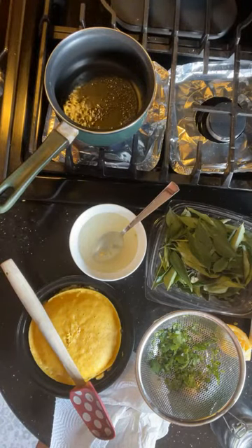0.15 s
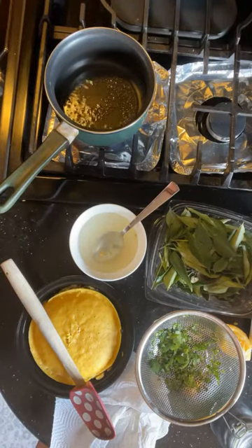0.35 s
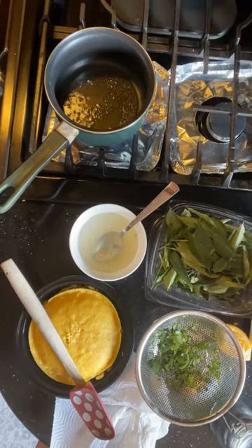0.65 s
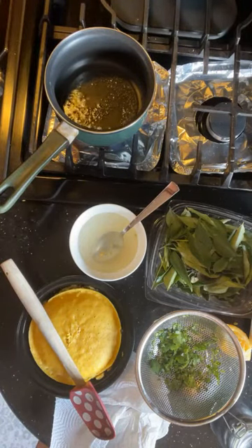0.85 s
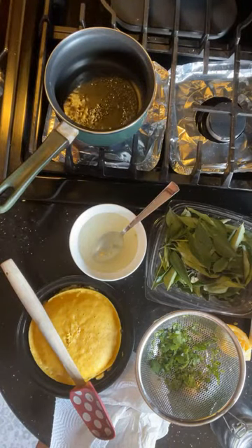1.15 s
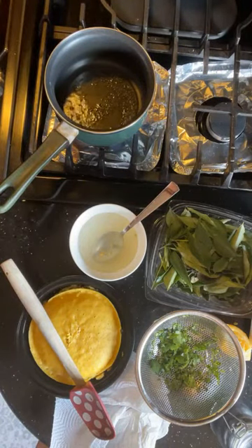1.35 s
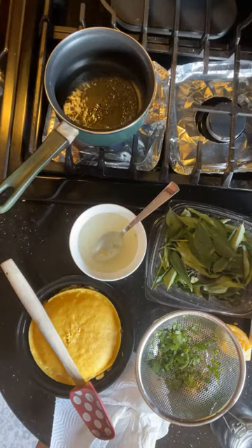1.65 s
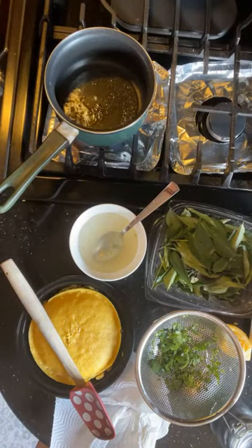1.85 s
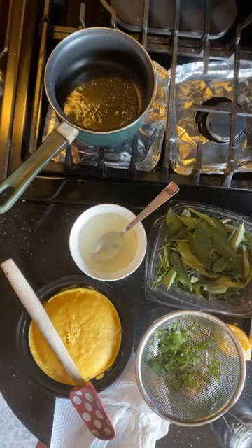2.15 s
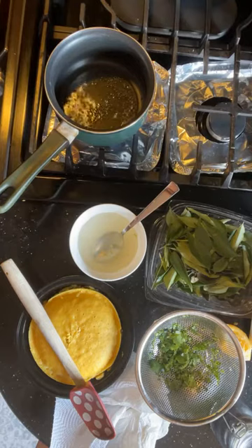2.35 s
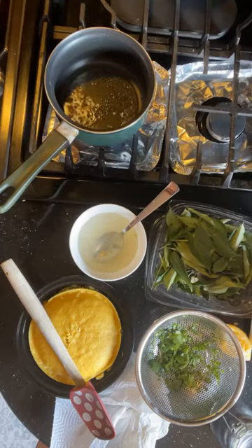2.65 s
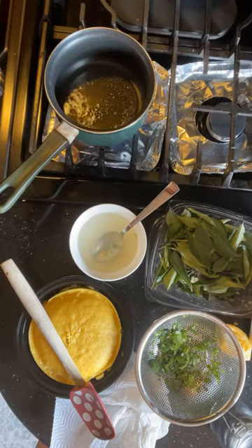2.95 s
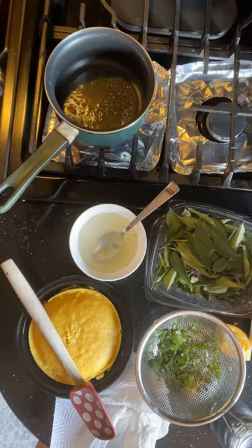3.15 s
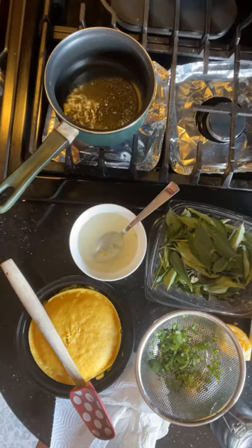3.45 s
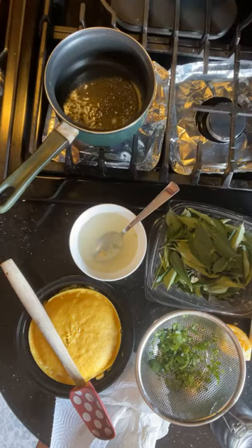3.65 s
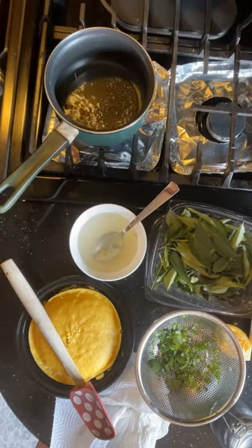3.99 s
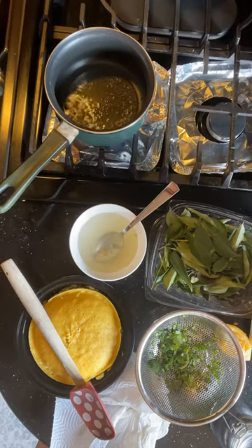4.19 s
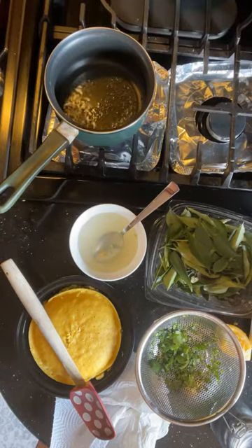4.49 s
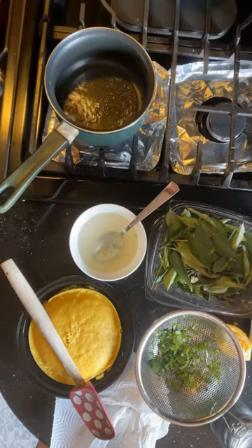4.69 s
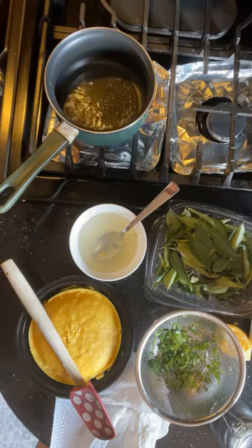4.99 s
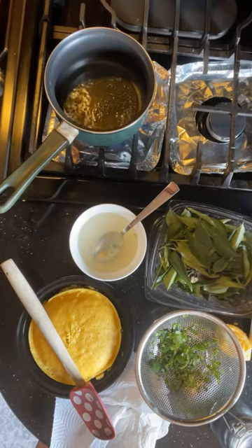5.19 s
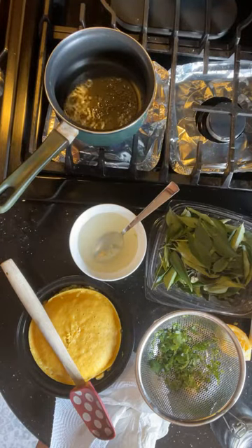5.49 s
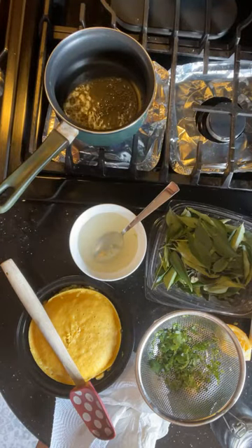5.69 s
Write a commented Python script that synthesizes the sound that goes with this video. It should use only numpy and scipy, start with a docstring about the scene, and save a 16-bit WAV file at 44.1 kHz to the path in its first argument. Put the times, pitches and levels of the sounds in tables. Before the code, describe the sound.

Close, sharp pops of seeds bursting in hot oil ring briefly in a small metal pan over a faint fizz and low kitchen hum. Early pops are scattered; from about 1.4 seconds they become frequent, and from 3 seconds strong and dense. A drawer slides and knocks heavily near 0.7 seconds, with lighter utensil clicks later and short metal scrapes around 3.5. Single nearby microphone, mono, small hard room.

```python
"""Sharp pops of mustard seeds bursting in hot oil, over a faint fizz and a low room hum.
Further off, a drawer slides, utensils knock and rattle, and metal scrapes briefly on metal.
Pops and knocks are filtered clicks that set dying tones ringing and leave echoes of fading noise.
Sliding and hum are shaped noise; fizz and scraping are made of thousands of tiny random clicks."""
import sys
import numpy as np
from scipy import signal
from scipy.fft import rfft, irfft
from scipy.io import wavfile

SR = 44100
rng = np.random.default_rng(int(sys.argv[2]) if len(sys.argv) > 2 else 0)


def unload_wav(signal):
    """Save mono or channel-first audio to the path in sys.argv[1] as 16-bit WAV at rate SR, clipped to [-1, 1]."""
    wavfile.write(
        sys.argv[1],
        SR,
        np.round(np.clip(np.atleast_2d(signal).T, -1, 1) * 32767).astype(np.int16),
    )


N = 257103   # length of the scene in samples

# Colour of the room hum and oil fizz. Each row: pitch in Hz, relative level in dB per Hz.
FLOOR_COLOUR = [(18, -19), (30, -0.5), (98, 7), (359, -0.5), (455, 0), (752, -5.5), (858, 4), (900, -4),
                (1100, 1.5), (1270, -4.5), (1380, 5), (1620, -18), (2600, -16), (2810, -7.5), (4900, -14.5),
                (15200, -42), (16500, -19)]
FLOOR_DB = -59.5

# Simmer of the oil. Each row: time in seconds, level in dB.
SIMMER_LEVEL = [(0, -55.5), (.34, -67), (.6, -58.5), (.9, -58.5), (1.18, -63.5), (2.08, -59.5),
                (2.6, -62.5), (3.2, -56.5), (3.9, -58), (4.4, -54.5), (5.25, -59), (5.5, -56.5),
                (5.83, -58)]
# The oil flares up. Each row: start in seconds, length in seconds, level in dB, swell over the length in dB.
OIL_FLARES = [(.565, 0.094, -52, -11), (2.19, 0.098, -46, -17), (3.36, 0.23, -54, -1), (4.88, .05, -43, 0),
              (4.98, 0.11, -39.5, -15.5)]
FLARE_RISE_DB_PER_S, FLARE_FALL_DB_PER_S = 604, 110

# Seed bursts. Each row: time in seconds, level of the snap (4.5-9.5 kHz) in dB, then in dB against
# the snap: body (2-4.5 kHz), low push (100-500 Hz), air (9.5-16.5 kHz); last the pitch of the ping in Hz.
SEED_POPS = [(0.0574, -22.5, -9.5, -19.5, 6, 3110), (0.2233, -40, -2, -24, -12, 3130),
             (.2547, -40, -30, -20, -4, 3270), (0.4408, -30.5, 3.5, -47, -23, 3810),
             (0.455, -48, 0, -23, -2, 3100), (0.4747, -26.5, -9, -50, -18, 4560),
             (1.0438, -40, -21, -15, 4, 3750), (1.083, -31, -1.5, -16.5, -13, 4080),
             (1.2199, -33, -6.5, -48, 0, 4320), (1.3927, -42, -18, -34, 3, 4040),
             (1.4062, -29, -16, -44, -7, 3760), (1.4264, -30, -9.5, -38, -13, 3670),
             (1.4792, -30, 2, -29, -2, 3430), (1.5108, -38, -27, -33, 3, 3830),
             (1.6067, -37, -6.5, -33, -5, 3640), (1.737, -32, -13, -26, -5, 3670),
             (1.7862, -9.5, -12.5, -38.5, -8, 3030), (1.8004, -26.5, -19, -41, 0, 3850),
             (1.811, -35, -17, -30, 11, 2820), (2.022, -20.5, -5, -39, -4.5, 4400),
             (2.0661, -29, -11, -23, -14, 3070), (2.0965, -19.5, -11.5, -43, -1, 4600),
             (2.1466, -28, -11, -9, -6, 4290), (2.2193, -37, -9, -30, 6, 4000),
             (2.2419, -22.5, -5, -16, -15, 2740), (2.2818, -23.5, -7, -23, -7, 3180),
             (2.2961, -13, -11.5, -41, -1.5, 5060), (2.375, -40, -7, -17, 6, 2920),
             (2.4067, -18, -9, -44, -10, 3970), (2.4199, -34, 10.5, -19, 9, 3030),
             (2.422, -27.5, 8, -2.5, 7.5, 3100), (2.502, -15.5, -13, -26.5, 0.5, 4600),
             (2.815, -29, -15.5, -50, -22, 4450), (2.8872, -32, 0.5, -26, -10, 3120),
             (2.9828, -17.5, -11, -38, -8, 3100), (3.0813, -16.5, -7.5, -20, -4, 3770),
             (3.092, -38, -5, -20, 13, 2820), (3.1848, -32.5, -22, -19, 2, 3500),
             (3.259, -26.5, 1, -46, -1.5, 3700), (3.276, -11, -12.5, -26.5, -3.5, 4600),
             (3.3194, -34, 0, -23, -2, 3700), (3.457, -45, 6, -25, 2.5, 4630),
             (3.489, -47, 4.5, -20, -1.5, 3830), (3.4978, -33.5, -8, -6, -4, 4600),
             (3.5232, -15.5, -9.5, -41, -5, 3060), (3.572, -22.5, -11, -19, 2, 4740),
             (3.625, -23.5, -15, -44, -7, 4370), (3.678, -16.5, -14, -29, -14, 4400),
             (3.7339, -12, -12, -65, -12, 4170), (3.858, -34, 3, -30, -10, 3480),
             (3.8636, -38, -4, -28, -7, 3530), (3.8866, -17, -10, -50, -10, 3900),
             (3.9283, -27, 1.5, -47, -1, 3100), (3.9318, -9, -9.5, -31.5, -5.5, 3170),
             (4.0081, -14, -6, -43, -4.5, 3360), (4.124, -12.5, -4, -41, -0.5, 2880),
             (4.2173, -17.5, -13, -38, 7, 3080), (4.3384, -24.5, 4, -38, -12, 3050),
             (4.4241, -16.5, -4, -32, 4.5, 3710), (4.4346, -15.5, -9, -21, -1, 3780),
             (4.5018, -40, 2, -30, -6, 2890), (4.6497, -59.5, 15.5, -26, -2.5, 3000),
             (4.735, -22.5, -9.5, -29, 6.5, 4470), (4.8417, -24.5, -5.5, -31, -1, 4100),
             (4.9203, -13, -1.5, -20, -2.5, 3020), (4.9503, -22, -23, -30, -2, 3620),
             (4.983, -13.5, -4, -45, -17, 3800), (5.0578, -15.5, -14.5, -51, -14, 3900),
             (5.1115, -26, -7.5, -41, 2, 4180), (5.2788, -36, -11, -27, -4, 4500),
             (5.3408, -33, 15.5, -28, 4, 2970), (5.3751, -20.5, -5, -34, -7, 2680),
             (5.4185, -28, 1, -27, -6, 4600), (5.4857, -27.5, -11, -14, -6, 3790),
             (5.5678, -30.5, -6.5, -35, -13, 4400), (5.5878, -41, 3.5, -41, -1.5, 3220),
             (5.597, -35.5, 0, -34, -6, 3700), (5.657, -16.5, -6.5, -29.5, -7, 3000),
             (5.8197, -21, -12, -45, -14, 3940)]
# Borders between the five bands of a pop, in Hz.
POP_BAND_EDGES_HZ = [100, 500, 2000, 4500, 9500, 16500]
# Air column and wall of the pan. Each row: pitch in Hz, level in dB, time to die by 60 dB in seconds.
PAN_MODES = [(912, -37.5, 0.091), (1953, -39, 0.079), (2880, -45.5, 0.2), (3600, -46, 0.16),
             (5040, -50, 0.13), (6260, -37.5, 0.031), (7515, -33, 0.013), (8145, -37, 0.018)]
# Echoes after a pop. Each row: pitch in Hz, time to die by 60 dB in seconds.
NEAR_ECHO_DECAY = [(500, 0.01), (1300, 0.18), (3500, 0.2), (9000, 0.24), (16000, 0.15)]
POP_DELAY_S = 0.0006   # short fixed delay before each pop sounds
# Level at 0.5-2 kHz against the snap: grows with body and push.
THUD_DB, THUD_PER_BODY, THUD_PER_PUSH = -7.5, 0.28, 0.23
# Droplets land later than the pop, and weaker; each gets a random share of the spread.
DROPLET_S, DROPLET_SPREAD_S = 0.001006, 0.007
DROPLET_DB, DROPLET_SPREAD_DB = -7, 20.5
# Steam pocket left by the burst: it pings loudest after strong, full-bodied pops.
PING_DB, PING_PER_SNAP, PING_PER_BODY = -13.5, 0.45, 0.99
PING_CYCLES = 34   # swings until it has died by 60 dB
EARLY_ECHO_S = 0.0014   # how quickly the extra strength of the first echoes fades

# Drawer and objects sliding. Each row: start in seconds, length in seconds, level in dB,
# swell over the stroke in dB, level of the rumble at its end in dB.
SLIDE_STROKES = [(0.244, 0.38, -47.5, -9, -61), (0.692, 0.18, -42, 4.5, -34), (2.157, 0.11, -50.5, 9, -50),
                 (2.457, 0.07, -51.5, 1.9, -54), (3.438, 0.11, -51, 3, -49), (4.407, 0.13, -61, 10, -73),
                 (5.003, 0.033, -50, -2.5, -63), (5.398, .03, -40.5, 1, -54),
                 (5.526, .17, -75.5, 18.5, -59)]
# Colour of the rubbing. Each row: pitch in Hz, relative level in dB per Hz.
RUBBING_COLOUR = [(88, -60), (150, -5), (561, 2), (632, -5), (861, -1), (1060, -4.5), (2810, -15),
                  (3280, -14), (9000, -23.5), (11700, -77), (19800, -120)]
SLIDE_RISE_DB_PER_S, SLIDE_FALL_DB_PER_S = 172, 122
RUMBLE_RISE_DB_PER_S, RUMBLE_FALL_DB_PER_S = 185, 142

# Utensils and drawer knocking; the faint rows at 4.885 and 4.999 are sizzles of oil.
# Each row: time in seconds, level of the clack (0.7-1.6 kHz) in dB, then in dB against the clack:
# bass (75-200 Hz), treble (3.5-8 kHz), hollow note; last the pitch of that note in Hz.
KNOCK_EVENTS = [(0.653, -32.5, -3.5, -9, -1.5, 445), (.732, -15, -9, -12.5, -12, 970),
                (.75, -18.5, -2, -28, -18, 1170), (.794, -20.5, 1, -55, -13, 1210),
                (2.133, -37, -18, -16, -9, 610), (2.167, -32, -14, -15, -12, 1060),
                (2.3, -29.5, -3.5, 6, -15, 704), (2.315, -33, -10.5, 10, -1.5, 613),
                (4.374, -23.5, -46, 10.5, -2.5, 646), (4.467, -31.5, -32, 7.5, -17, 1050),
                (4.523, -23.5, -31, 17.5, -3, 1070), (4.885, -35, -10, 1, -3, 880),
                (4.999, -39, -13, 2, -24, 925), (5.17, -50, -15, -9, 5, 1094),
                (5.302, -35, -32, -17, 2, 1030), (5.352, -19, -50, -7, -10, 565)]
# Borders between the six bands of a knock, in Hz.
KNOCK_BAND_EDGES_HZ = [75, 200, 700, 1600, 3500, 8000, 16000]
# Worktop and cupboard under the knocks, and the pan ringing along near 2.9 kHz. Each row: pitch in Hz, level in
# dB, time to die by 60 dB in seconds.
CUPBOARD_MODES = [(92, -36.5, 0.117), (219, -53, 0.22), (399, -45, 0.055), (1325, -46, 0.026),
                  (2184, -35, 0.034), (2910, -42, 0.052), (3810, -38, 0.03), (4310, -33, 0.027)]
# Echoes after a knock. Each row: pitch in Hz, time to die by 60 dB in seconds.
FAR_ECHO_DECAY = [(80, 0.24), (400, 0.27), (1500, 0.3), (5000, 0.24), (12000, 0.11)]
LOW_DB, LOW_PER_BASS = 1, 0.17   # 200-700 Hz follows the bass
MID_DB, MID_PER_TREBLE = 2.5, 0.36   # 1.6-3.5 kHz follows the treble
TOP_DB, TOP_PER_TREBLE = -5.5, 1.17   # and so does 8-16 kHz
# A knocked object bounces three times within this time, each bounce weaker than the knock.
RATTLE_S, RATTLE_DB, RATTLE_SPREAD_DB = 0.07, -8, 10.5

# Metal scraping on metal. Each row: start in seconds, length in seconds, level in dB, swell over the stroke in dB.
SCRAPE_STROKES = [(3.44, 0.085, -44, 8), (3.665, 0.076, -28.5, -11)]
# Thin metal under the scrape. Each row: pitch in Hz, width in Hz, relative level in dB.
METAL_MODES = [(4500, 110, 0), (5880, 180, -2), (7150, 90, -1), (8050, 70, -1), (8450, 60, -3),
               (9900, 80, -3), (11420, 90, -4), (13000, 100, -5), (13800, 80, -6), (14800, 100, -3)]
SCRAPE_RISE_DB_PER_S, SCRAPE_FALL_DB_PER_S = 900, 350

CUTOFF_HZ = 17000   # from here up almost nothing is left


def amp(db):
    """Turn decibels into a gain."""
    return 10 ** (np.asarray(db) / 20)


def rms_one(x):
    """Scale a sound so that its average strength (rms) is 1."""
    return x / np.sqrt(np.mean(x ** 2) + 1e-20)


def at_hz(points, hz):
    """Read a table between its rows, with pitch on a logarithmic axis as the ear hears it."""
    table = np.array(points)
    return np.interp(np.log(hz), np.log(table[:, 0]), table[:, 1])


def band(x, low_hz, high_hz):
    """Keep mainly what lies between two pitches."""
    return signal.sosfilt(signal.butter(2, [low_hz, high_hz], "band", fs=SR, output="sos"), x)


def coloured(spectrum):
    """Noise with the given spectrum, rms 1."""
    hz = np.maximum(np.fft.rfftfreq(N, 1 / SR), 1)
    white = rng.standard_normal(N)
    return rms_one(irfft(rfft(white) * amp(at_hz(spectrum, hz)), N))


def grains(per_s, spread_db):
    """Random clicks of uneven size and either sign, rms 1."""
    size_db = spread_db * np.minimum(rng.exponential(1, N), 5)
    sizes = amp(size_db) * rng.choice([-1, 1], N)
    present = rng.random(N) < per_s / SR
    return rms_one(sizes * present)


def strokes(rows, rise_db_per_s, fall_db_per_s):
    """Gain of strokes that rise, swell over their length and fall away."""
    t = np.arange(N) / SR
    gain = 0
    for s, length, db, swell_db in rows:
        swell = swell_db * np.clip((t - s) / length, 0, 1)
        rise = rise_db_per_s * np.maximum(s - t, 0)
        fall = fall_db_per_s * np.maximum(t - s - length, 0)
        gain = gain + amp(db + swell - rise - fall)
    return gain


def impulses(at_s, db):
    """Single-sample clicks."""
    clicks = np.full(N, 1e-18)   # not quite zero, which keeps the filters fast
    clicks[(at_s * SR).astype(int)] = amp(db)
    return clicks


def blows(at_s, band_db, edges_hz):
    """One click per event, built from steep bands that each peak at about their own level."""
    out = 0
    for db, low, high in zip(band_db, edges_hz, edges_hz[1:]):
        once = band(impulses(at_s, db), low, high)
        # A narrow band passes less of a click, so it is raised more.
        out = out + band(once, low, high) * SR / (2 * (high - low))
    return out


def ring(x, hz, t60):
    """A resonance: a unit click sets a sine of height 1 ringing, which dies by 60 dB in t60 seconds."""
    r, w = amp(-60 / (t60 * SR)), 2 * np.pi * hz / SR
    return signal.lfilter([0, np.sin(w)], [1, -2 * r * np.cos(w), r * r], x + 1e-18)


def struck(hit, modes):
    """The blow together with the resonances that it sets ringing."""
    return hit + sum(amp(db) * ring(hit, hz, t60) for hz, db, t60 in modes)


def pings(at_s, db, hz, cycles):
    """A dying tone for each event, at its own pitch; higher tones die sooner."""
    out, t = np.zeros(N + SR), np.arange(SR // 3) / SR
    for s, level_db, f in zip(at_s, db, hz):
        start = int(s * SR)
        fade = amp(level_db - 60 * t * f / cycles)
        out[start:start + len(t)] += fade * np.sin(2 * np.pi * f * t)
    return out[:N]


def tail(x, decays, rise_s, early_db):
    """Diffuse echoes: noise that dies band by band, stronger in the first milliseconds; energy 1."""
    t, echo = np.arange(SR // 2) / SR, 0
    edges = 50 * 2 ** np.arange(0, 8.6, .5)   # half-octave bands
    for low, high in zip(edges, edges[1:]):
        t60 = at_hz(decays, np.sqrt(low * high))
        echo = echo + band(rng.standard_normal(len(t)), low, high) * amp(-60 * t / t60)
    onset = 1 - np.exp(-t / rise_s)
    early = amp(early_db * np.exp(-t / EARLY_ECHO_S))
    echo = echo * onset * early
    return signal.fftconvolve(x, echo / np.sqrt(np.sum(echo ** 2)))[:N]


def room_floor():
    """Steady noise coloured like room hum and oil fizz."""
    return amp(FLOOR_DB) * coloured(FLOOR_COLOUR)


def fizz():
    """Countless tiny steam bubbles breaking at the surface of the oil; flares span a narrower band than the simmer."""
    bubbles = grains(8000, spread_db=2)
    simmer = amp(np.interp(np.arange(N) / SR, *np.transpose(SIMMER_LEVEL)))
    flares = strokes(OIL_FLARES, FLARE_RISE_DB_PER_S, FLARE_FALL_DB_PER_S)
    return simmer * rms_one(band(bubbles, 980, 16700)) + flares * rms_one(band(bubbles, 2530, 7700))


def pops(count=5):
    """Each burst: a sharp click, droplets landing, the pan ringing, and one of five sets of random echoes."""
    out, luck = np.zeros(N), rng.random((len(SEED_POPS), 4))
    for turn in range(count):   # the bursts take turns between five sets of random echoes
        s, snap, body, push, air, ping_hz = np.transpose(SEED_POPS[turn::count])
        s = s + POP_DELAY_S
        thud = THUD_DB + THUD_PER_BODY * body + THUD_PER_PUSH * push
        levels = snap + np.array([push, thud, body, 0 * snap, air])
        click = blows(s, levels, POP_BAND_EDGES_HZ)

        late, weak = luck[turn::count].T.reshape(2, 2, -1)   # two droplets per burst
        lands = np.minimum(s + DROPLET_S + DROPLET_SPREAD_S * late, (N - 1) / SR).ravel()
        droplets = np.hstack([levels + DROPLET_DB - DROPLET_SPREAD_DB * w for w in weak])
        click -= blows(lands, droplets, POP_BAND_EDGES_HZ)   # opposite sign to the burst

        ping_db = PING_DB + PING_PER_SNAP * snap + PING_PER_BODY * body
        near = struck(click, PAN_MODES) + pings(s, ping_db, ping_hz, PING_CYCLES)
        out += near + amp(-3) * tail(near, NEAR_ECHO_DECAY, rise_s=0.002, early_db=38)
    return out


def slide():
    """Rubbing noise with a lumpy grain, and the rumble that it sends into the cupboard as each stroke ends."""
    lumps = 1 + 0.13 * rms_one(band(rng.standard_normal(N), 36, 53))
    rub = strokes([row[:4] for row in SLIDE_STROKES], SLIDE_RISE_DB_PER_S, SLIDE_FALL_DB_PER_S)
    rubbing = rub * lumps * coloured(RUBBING_COLOUR)

    stops = [(s + length, 1 / SR, db, 0) for s, length, _, _, db in SLIDE_STROKES]
    rumble_gain = strokes(stops, RUMBLE_RISE_DB_PER_S, RUMBLE_FALL_DB_PER_S)
    return rubbing + rumble_gain * rms_one(band(rng.standard_normal(N), 73, 119))


def knocks(count=3):
    """Distant blows that rattle out with hollow notes through cupboard and room; two faint ones are oil sizzles."""
    out, luck = np.zeros(N), rng.random((len(KNOCK_EVENTS), 6))
    for turn in range(count):   # the knocks take turns between three sets of random echoes
        s, clack, bass, treble, note, note_hz = np.transpose(KNOCK_EVENTS[turn::count])
        low = LOW_DB + LOW_PER_BASS * bass
        mid = MID_DB + MID_PER_TREBLE * treble
        top = TOP_DB + TOP_PER_TREBLE * treble
        levels = clack + np.array([bass, low, 0 * clack, mid, treble, top])

        late, weak = luck[turn::count].T.reshape(2, 3, -1)   # three bounces per knock
        bounces = [levels + RATTLE_DB - RATTLE_SPREAD_DB * w for w in weak]
        times = np.hstack([s, *(s + RATTLE_S * late)])
        hit = blows(times, np.hstack([levels, *bounces]), KNOCK_BAND_EDGES_HZ)

        body = struck(hit, CUPBOARD_MODES) + pings(s, clack + note, note_hz, cycles=55)
        out += amp(-5.5) * body + amp(2.5) * tail(body, FAR_ECHO_DECAY, rise_s=0.0011, early_db=16.5)
    return out


def scrape():
    """Dense tiny contacts drive the thin modes of the metal; each mode comes and goes as the contact moves."""
    rub = grains(5000, spread_db=2.5)
    rings = 0
    for hz, width, db in METAL_MODES:
        contact_db = 5 * rms_one(band(rng.standard_normal(N), 4, 14))
        # A narrower mode rings longer.
        rings = rings + amp(db + contact_db) * rms_one(ring(rub, hz, 2.2 / width))
    mix = rms_one(rings) + amp(-5) * rms_one(band(rub, 4000, 15500))
    return strokes(SCRAPE_STROKES, SCRAPE_RISE_DB_PER_S, SCRAPE_FALL_DB_PER_S) * rms_one(mix)


def scene():
    """All sources added together at one microphone."""
    return (room_floor() + fizz() + pops() + slide() + knocks() + scrape())[None]


def record(dry):
    """The microphone drops the deepest bass; treble falls a step near 15.6 kHz and is cut off higher up."""
    dry = signal.sosfilt(signal.butter(2, 50, "high", fs=SR, output="sos"), dry)
    dull = signal.sosfilt(signal.ellip(8, .5, 45, 15600, fs=SR, output="sos"), dry)
    stepped = dull + amp(-25.5) * dry   # a little treble stays above the step
    return signal.sosfilt(signal.cheby2(12, 70, CUTOFF_HZ, fs=SR, output="sos"), stepped)


dry = scene()
out = record(dry)
unload_wav(out)
```